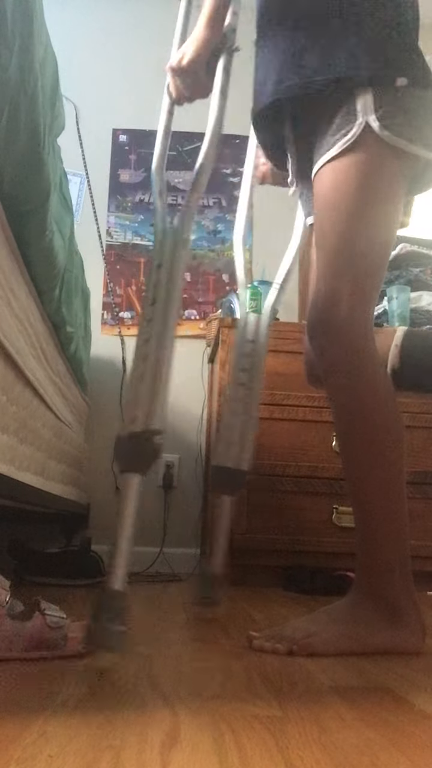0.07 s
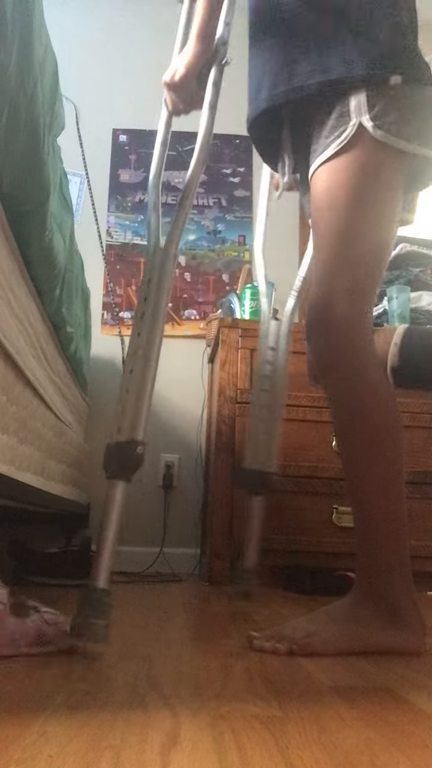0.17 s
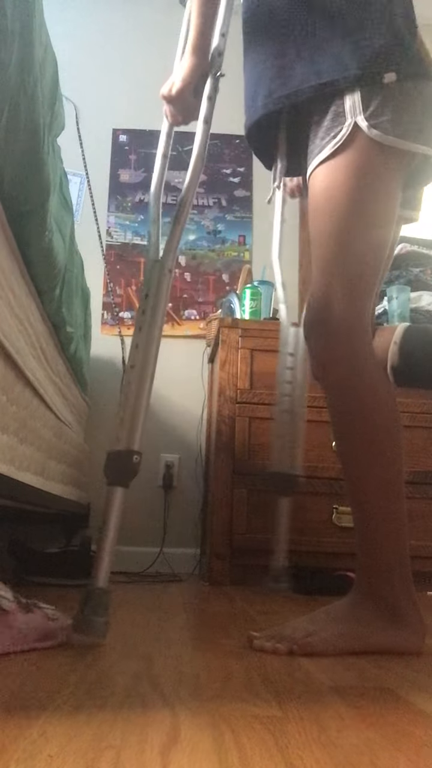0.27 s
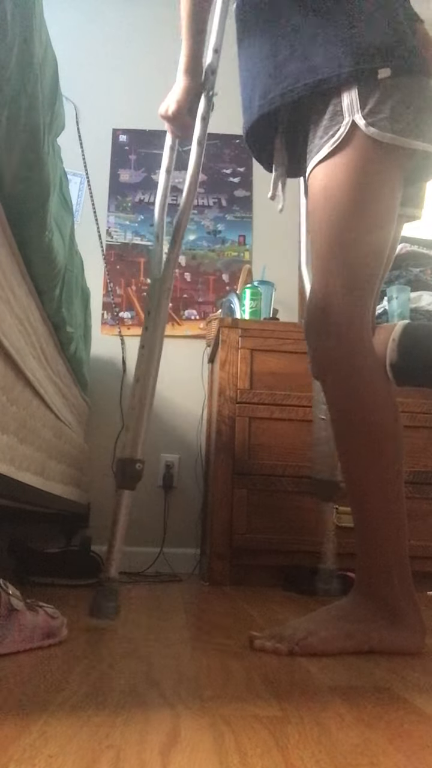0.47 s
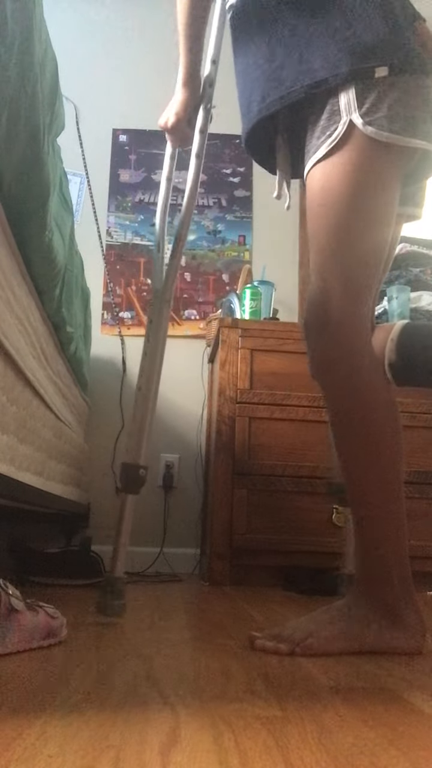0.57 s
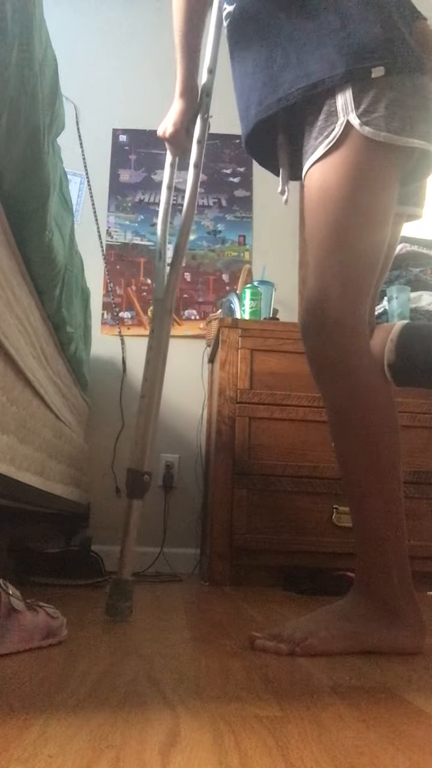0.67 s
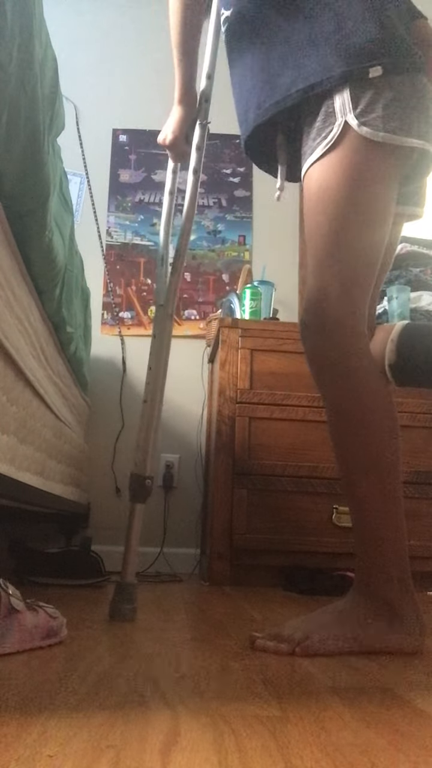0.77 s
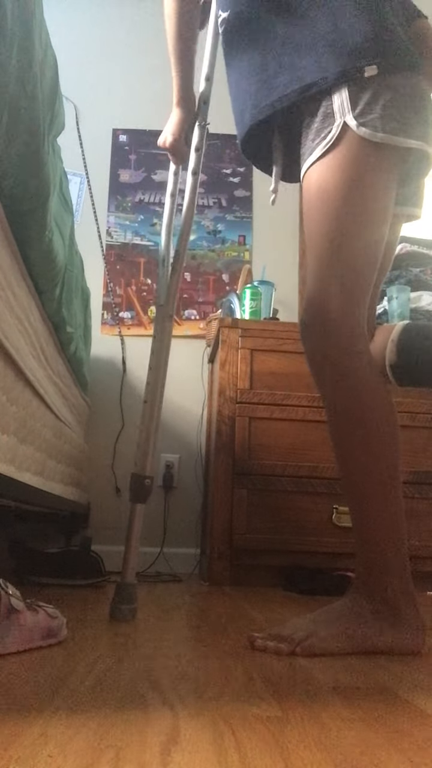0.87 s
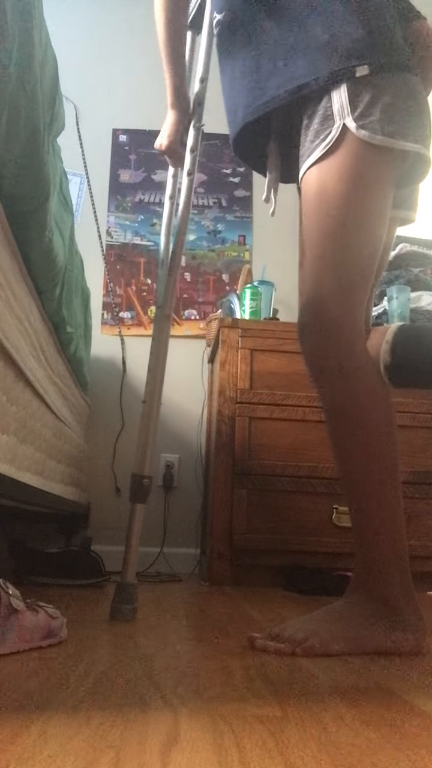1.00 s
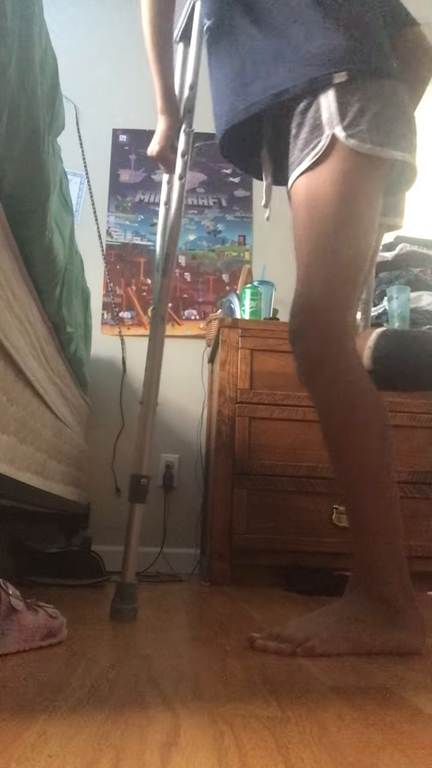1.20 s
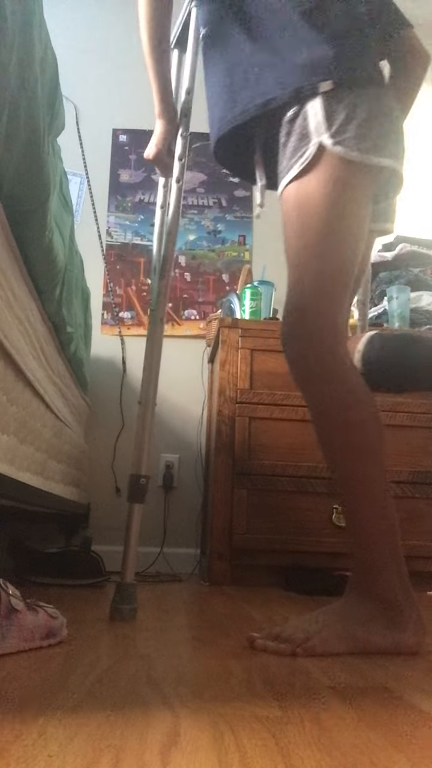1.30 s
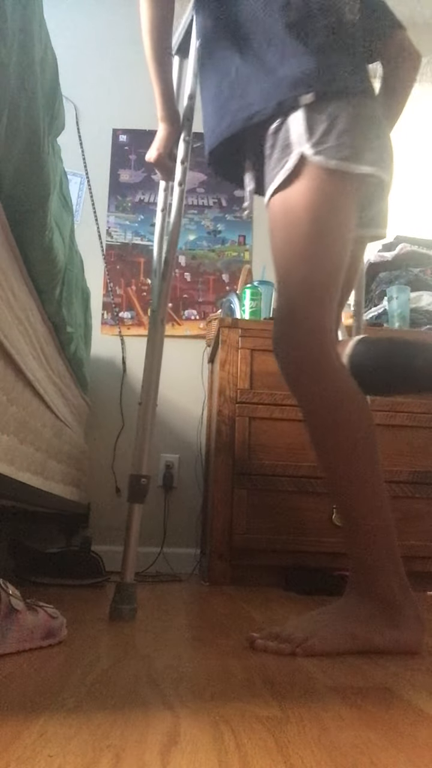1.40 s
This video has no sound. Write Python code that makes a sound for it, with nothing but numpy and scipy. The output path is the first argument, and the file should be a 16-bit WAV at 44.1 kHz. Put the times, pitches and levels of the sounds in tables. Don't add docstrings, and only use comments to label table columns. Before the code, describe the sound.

Aluminium crutches are planted on a wooden floor with a quick cluster of hollow knocks and metallic rattles, then a quieter thud with joint clicks as weight comes on, close to a phone in a small room.

```python
import sys
import numpy as np
from scipy import signal
from scipy.io import wavfile
from scipy.ndimage import uniform_filter1d

SR = 44100
rng = np.random.default_rng(int(sys.argv[2]) if len(sys.argv) > 2 else 0)


def rack_gain(trim_db):
    fader = np.asarray(trim_db, float)
    return 10 ** (fader / 20)


def store_pcm(level_fs):
    pcm = np.round(np.clip(level_fs, -1, 1) * 32767).astype(np.int16)
    wavfile.write(sys.argv[1], SR, np.atleast_2d(pcm).T)


N = 63945

# [start_s, level_db, pitch_hz, length_s]
TIP_PUSHES = [(0.001, -53, 233, 0.0043), (0.242, -19, 233.5, 0.012), (0.263, -23, 190, 0.011),
              (0.299, -27, 261.5, 0.0095), (0.317, -23, 159.5, 0.0241), (0.336, -32, 174.5, 0.013),
              (0.352, -27.5, 142.7, .025), (0.372, -35, 165, 0.025), (0.392, -49, 155, 0.016),
              (0.415, -45, 158, 0.022), (0.478, -55, 154, 0.02), (0.52, -54.5, 156, 0.013),
              (0.869, -40, 138.6, 0.017), (0.893, -45.5, 126.6, 0.036), (0.937, -31.5, 139, 0.014),
              (0.965, -43.5, 135, 0.037), (0.938, -55.5, 438, 0.013), (0.926, -46, 309.3, .012),
              (1.0, -65, 196, 0.0067), (1.168, -55, 335.4, 0.011), (1.172, -57.5, 211, 0.023),
              (1.18, -52, 144, 0.017), (1.207, -54, 218.3, 0.039)]
# [pitch_hz, level_db, fade_60db_s]
BOARD_TONES = [(124, -24, 0.17), (155.56, -1.5, 0.22), (186.6, 5, 0.078), (243.2, 7, 0.07),
               (300, -23, 0.045), (376.6, 5, 0.04), (434, -33, 0.031), (618.6, 6.5, 0.074)]


def thump(start_s, level_db, pitch_hz, length_s):
    push_db, ring_db, spread_octaves = -2.5, -6.5, 0.53
    release = 1.01
    flex_hz = 113.3
    t = np.arange(SR // 2) / SR
    u = 2 * t / length_s
    press = np.sin(np.pi * u / 2) ** 2
    let_go = np.exp(-((u - 1) / release) ** 1.9)
    push = np.where(u < 1, press, let_go) * np.sin(2 * np.pi * pitch_hz * t)
    push = signal.sosfilt(signal.butter(4, flex_hz, "high", fs=SR, output="sos"), push)
    ring = np.zeros(len(t))
    for hz, tone_db, fade_s in BOARD_TONES:
        distance = (np.log2(hz / pitch_hz) / spread_octaves) ** 2
        fading_db = tone_db - 4.63 * np.minimum(distance, 4.5) - 60 * t / fade_s
        ring += rack_gain(fading_db) * np.sin(2 * np.pi * hz * t)
    ring *= 1 - np.exp(-u ** 2)
    return start_s, rack_gain(level_db) * (rack_gain(push_db) * push + rack_gain(ring_db) * ring)


def resonate(x, hz, width_hz):
    r, w = np.exp(-np.pi * width_hz / SR), 2 * np.pi * hz / SR
    return signal.lfilter([1 - r, 0, r - 1], [1, -2 * r * np.cos(w), r * r], x)


# [start_s, peak_db, pitch_hz, spread_octaves, length_s]
JOINT_RATTLES = [(0.002, -55.5, 2750, 1.3, 0.0043), (0.209, -65, 2780, 0.56, 0.0058),
                 (0.224, -61.5, 3470, 1.3, 0.0027), (0.2405, -38.5, 1870, 1.37, 0.0052),
                 (0.2425, -42, 4500, 1.4, 0.0082), (0.2555, -32.5, 3520, 1.12, 0.0075),
                 (0.289, -41.5, 2970, 1.8, 0.007), (0.3228, -33.5, 5000, 2.24, 0.004),
                 (0.348, -44, 2800, 0.7, 0.0037), (0.8618, -40.5, 4760, 1.14, 0.007),
                 (0.871, -46.5, 2560, 1.41, 0.0014), (0.903, -50.5, 2970, 1.8, 0.0013),
                 (0.408, -55, 2900, .5, .005), (0.443, -59, 2700, .4, .005), (0.466, -61, 2550, .3, .003),
                 (0.479, -64, 4000, 1.5, .002), (0.911, -51, 2400, .5, .007), (0.9272, -40, 4500, .9, .006),
                 (0.9335, -38, 2450, .55, .005), (0.999, -49, 2750, .55, .007),
                 (1.111, -56, 4900, .9, .005), (1.1675, -53, 2420, .25, .004), (0.936, -49, 800, 1.2, .006),
                 (0.960, -47, 3400, 1.6, .006), (0.982, -53, 3200, 1.4, .006), (1.030, -58, 2600, .7, .005),
                 (1.130, -62, 3500, 1.8, .005), (1.17, -60, 650, 1.2, .004), (1.113, -70, 1300, .3, .01),
                 (0.944, -47, 4400, 1.3, .007)]
# [pitch_hz, width_hz, level_db]
TUBE_TONES = [(452, 110, -6), (650, 364, 16.5), (825, 340, -5), (1289, 65, 2), (1586, 540, 5.5),
              (2207, 334, 2.5), (2404, 164, -2), (2800, 337, -2), (3114, 660, -2.5), (4380, 520, -3),
              (4730, 680, -2.5), (5530, 300, -7.5), (6670, 500, -5.5), (8860, 340, -7)]


def rattle(peak_db, pitch_hz, spread_octaves, length_s, grit, colour):
    scatter_db, tick_db, top_hz = 1, -32, 10300
    t = np.arange(len(grit)) / SR
    chatter = grit * np.exp(-(t / length_s) ** 2) * np.minimum(t / 0.00069, 1)
    click = 1. * (t == 0)
    drives = np.array([chatter, click])
    tube = np.zeros(drives.shape)
    for (hz, width_hz, tone_db), shade in zip(TUBE_TONES, colour):
        favour_db = -10 * (np.log2(hz / pitch_hz) / spread_octaves) ** 2
        ring = resonate(resonate(drives, hz, 2 * width_hz), hz, width_hz)
        ring = ring / np.linalg.norm(ring, axis=1)[:, None]
        tube += rack_gain(tone_db + scatter_db * shade + favour_db) * ring
    tick = resonate(drives, pitch_hz, pitch_hz * spread_octaves)
    tube = tube / np.max(abs(tube[0])) + rack_gain(tick_db) * tick
    return rack_gain(peak_db) * signal.sosfilt(signal.butter(4, top_hz, fs=SR, output="sos"), tube)


# [start_s, level_db, pitch_hz, rise_s, fade_60db_s]
JOIST_HUMS = [
    (0.25, -67, 74, .02, 0.4),
    (0.33, -62, 70.5, .03, 0.59),
    (0.40, -50, 155.5, 0.028, 0.56),
    (0.871, -46.5, 124, 0.0084, 0.52),
    (0.935, -52.5, 70, 0.013, 0.45),
    (0.95, -50.5, 124, 0.02, 0.23),
    (1.185, -61, 216, 0.017, 0.43),
]


def hum(start_s, level_db, pitch_hz, rise_s, fade_s):
    t = np.arange(SR // 2) / SR
    swell = 1 - np.exp(-(t / rise_s) ** 2)
    return start_s, rack_gain(level_db - 60 * t / fade_s) * swell * np.sin(2 * np.pi * pitch_hz * t)


def read(points, hz):
    f, value = np.transpose(points)
    return np.interp(np.log(hz + 1), np.log(f + 1), value)


# [pitch_hz, fade_60db_s]
ROOM_FADES = [(150, 0.16), (500, 0.43), (1500, 0.2), (3000, 0.22), (6000, 0.21), (10000, 0.16)]


def room(x, taps):
    opening = np.clip(np.arange(len(taps)) / SR / 0.0063 - .4, 0, 1)
    hz, t, z = signal.stft(taps * opening, SR, nperseg=256)
    fading = rack_gain(-60 * t / read(ROOM_FADES, hz)[:, None])
    tail = signal.istft(z * fading, SR, nperseg=256)[1]
    return signal.fftconvolve(x, tail / np.linalg.norm(tail))[:N]


def evened(x):
    return x / np.sqrt(np.mean(x ** 2) + 1e-20)


# [pitch_hz, level_db_per_hz]
HUSH_COLOUR = [(25, -29), (50, -34), (70, -20), (105, -23.5), (135, -1), (240, -3.5), (480, -18.5),
               (15600, -35.5)]


def hush():
    level_db, patch_db = -69, 1.3
    whirr_hz, whirr_octaves, whirr_db = 1260, 0.22, 3.5
    frames, hz = N // 512 + 5, np.fft.rfftfreq(2048, 1 / SR)
    a, b, patches = rng.standard_normal((frames, 1025, 3)).T
    patches = evened(uniform_filter1d(uniform_filter1d(patches, 10, 0), 5, 1))
    width_octaves = np.where(hz < whirr_hz, whirr_octaves, 1.5)
    bump_db = whirr_db * np.exp(-(np.log2((hz + 1) / whirr_hz) / width_octaves) ** 2)
    colour_db = (read(HUSH_COLOUR, hz) + bump_db)[:, None]
    z = (a + 1j * b) * rack_gain(colour_db + patch_db * patches)
    return rack_gain(level_db) * evened(signal.istft(z, nperseg=2048, noverlap=1536)[1][:N])


def add(mix, start_s, sound):
    part = mix[max(round(start_s * SR), 0):][:len(sound)]
    part += sound[:len(part)]


def scene():
    room_db, board_room_db = -2.5, -7
    air = hush()
    signs = rng.choice([-1., 1.], (4, SR // 2))
    taps = signs * (rng.random((4, SR // 2)) < 2500 / SR)
    boards, close, around = np.zeros(N), np.zeros(N), np.zeros((3, N))
    for row in TIP_PUSHES:
        add(boards, *thump(*row))
    for row in JOIST_HUMS:
        add(boards, *hum(*row))
    for k, (start_s, *joint) in enumerate(JOINT_RATTLES):
        noise = rng.standard_normal(2049)
        grit = noise[:2048] * abs(noise[1:]) ** .5
        colour = rng.standard_normal(len(TUBE_TONES))
        near, spread = rattle(*joint, grit, colour)
        add(close, start_s, near)
        add(around[k % 3], start_s, spread)
    tube_echoes = sum(room(x, tap) for x, tap in zip(around, taps))
    board_echoes = room(boards, taps[3])
    mix = boards + rack_gain(board_room_db) * board_echoes + close + rack_gain(room_db) * tube_echoes + air
    return mix[None]


def top_cut(x):
    return signal.sosfilt(signal.butter(12, 15800, fs=SR, output="sos"), x)


def record(dry):
    heard = signal.sosfilt(signal.butter(4, 62, "high", fs=SR, output="sos"), dry)
    return top_cut(heard)


dry = scene()
out = record(dry)
store_pcm(out)
```